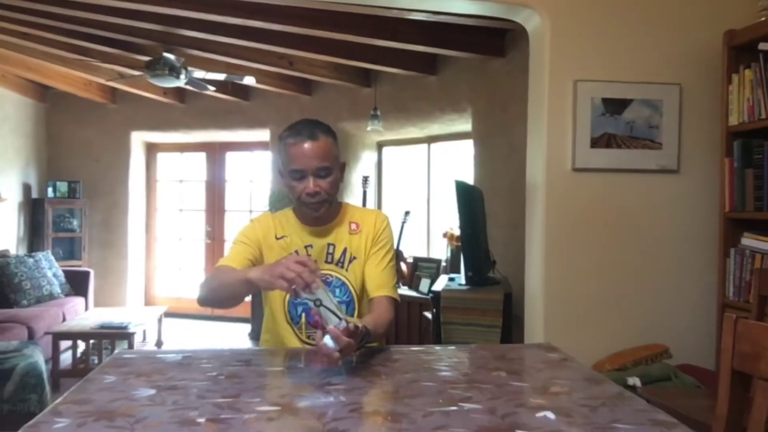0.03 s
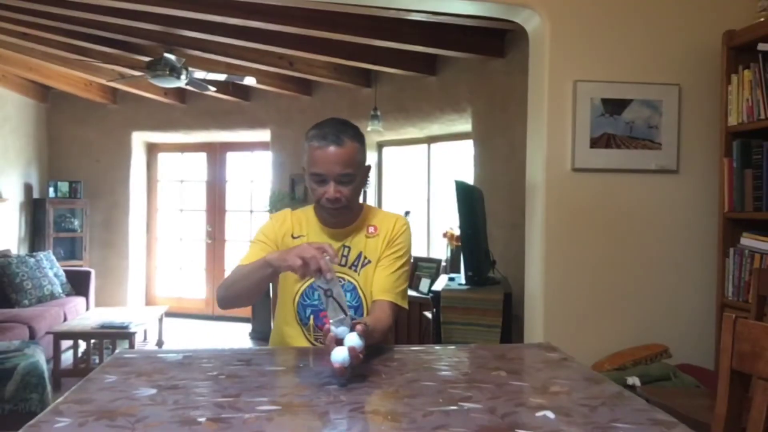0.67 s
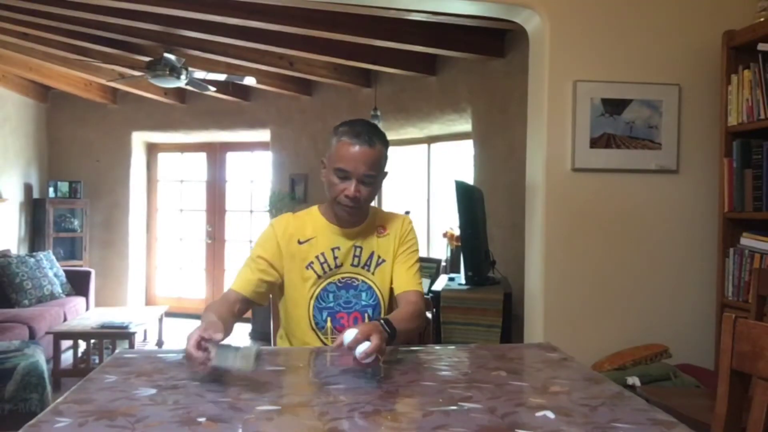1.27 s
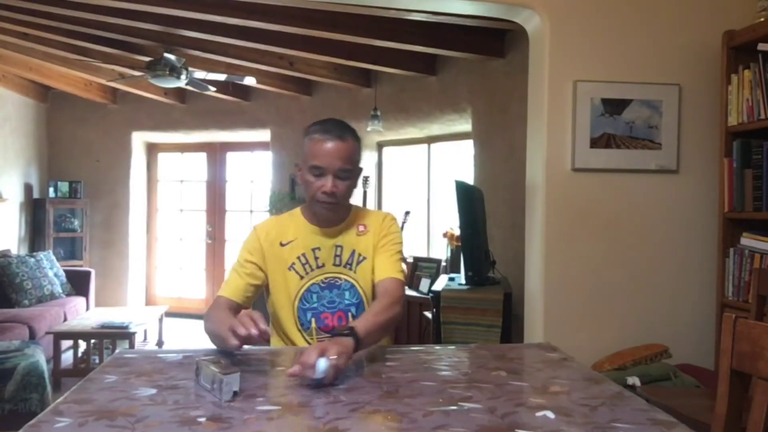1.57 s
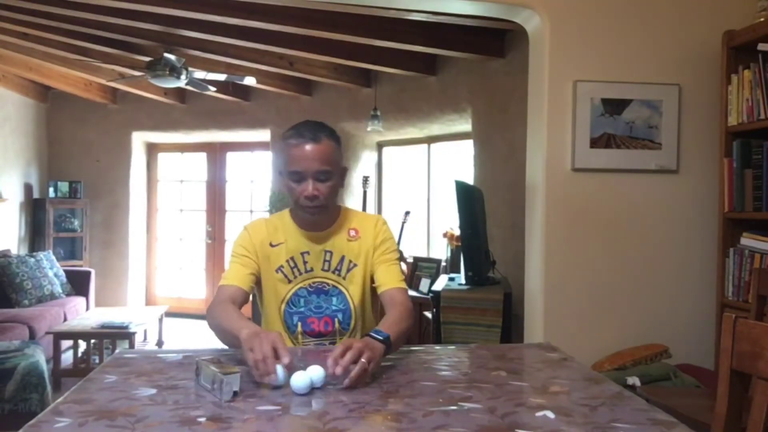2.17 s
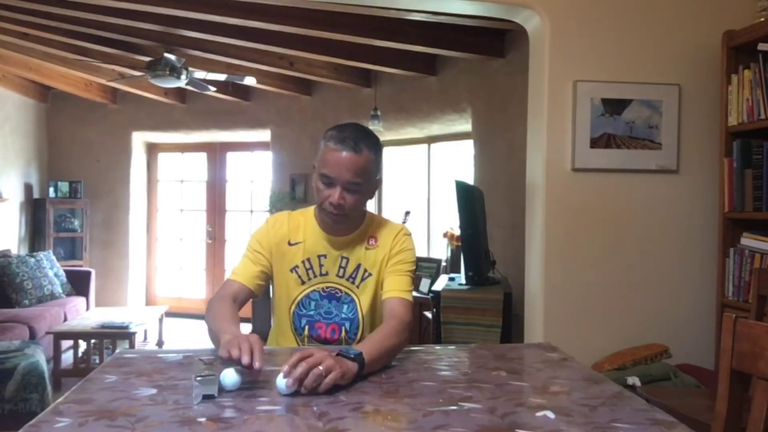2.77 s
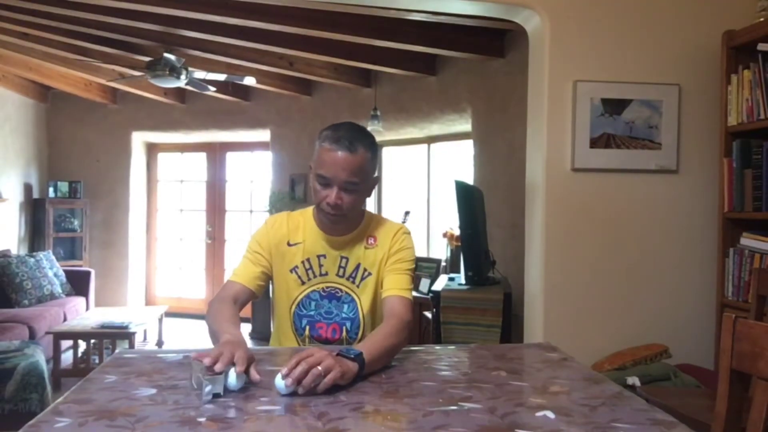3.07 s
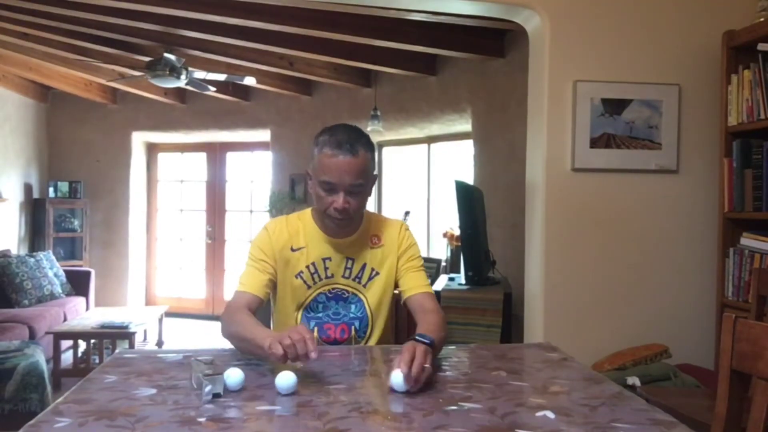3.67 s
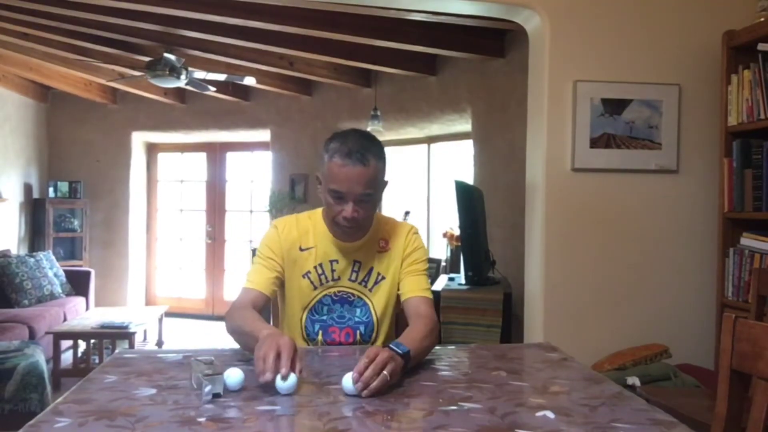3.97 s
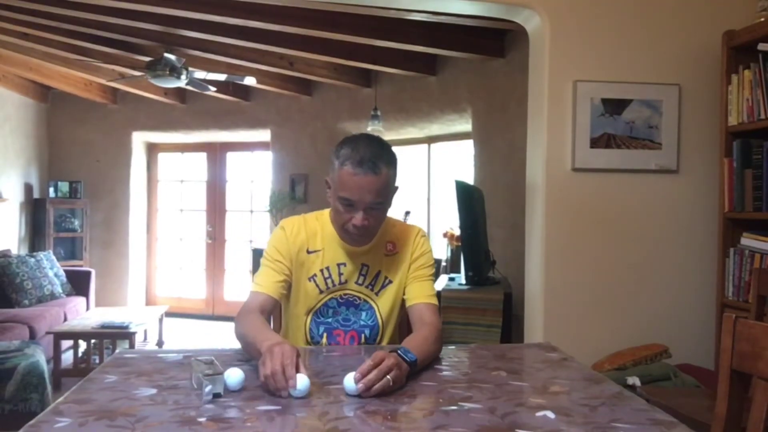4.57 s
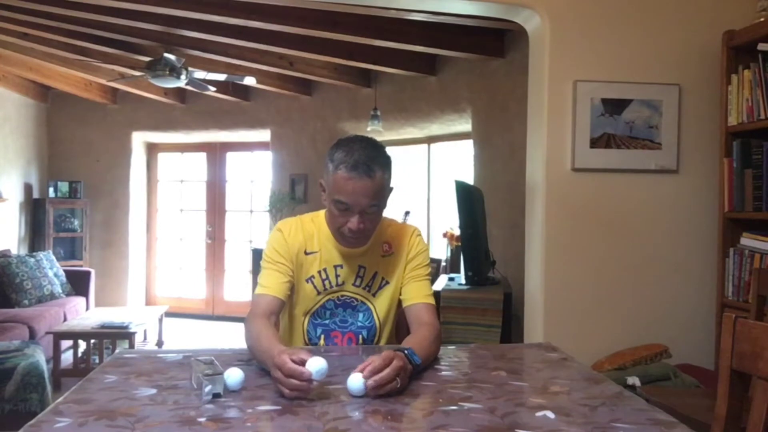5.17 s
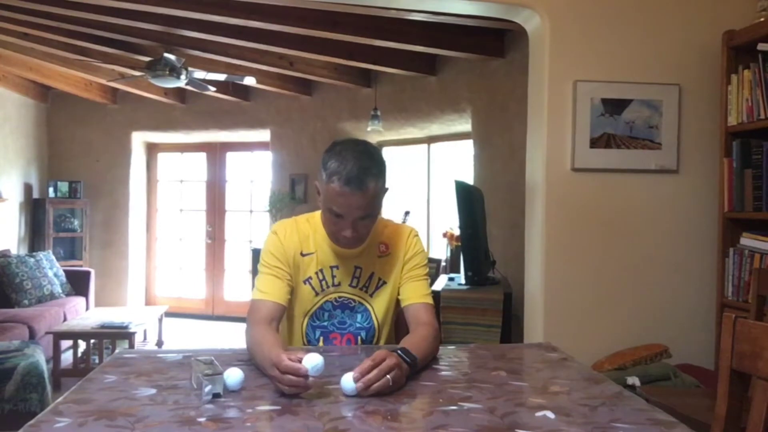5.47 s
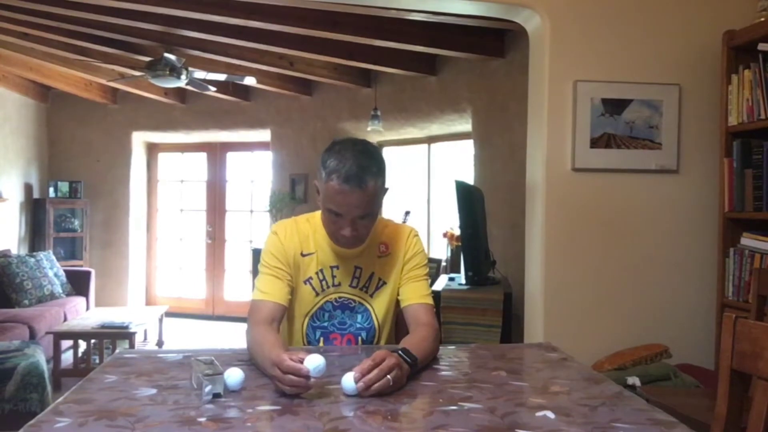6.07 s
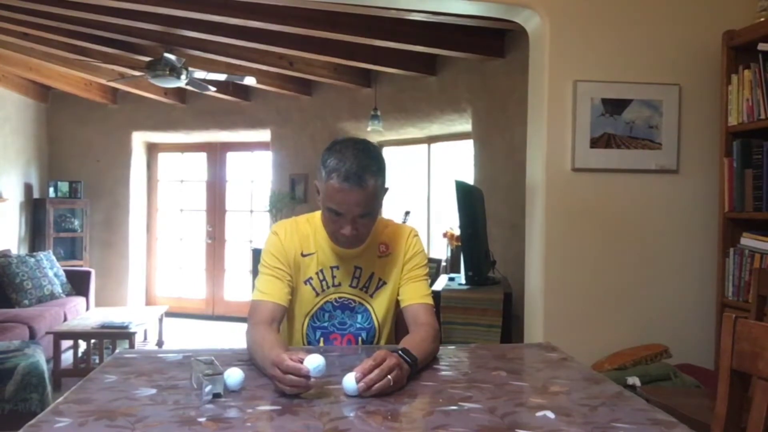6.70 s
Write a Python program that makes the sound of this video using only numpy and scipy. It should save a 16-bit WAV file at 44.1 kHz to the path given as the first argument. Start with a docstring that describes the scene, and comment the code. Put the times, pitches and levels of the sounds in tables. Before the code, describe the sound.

Golf balls knock and bounce on a booming tabletop indoors, after a small plastic case is handled and set down with a clack.

```python
"""Golf balls on a living-room table

Indoors, one microphone near a large table. Fingers rustle and tap on a plastic case, the case is
put down with a clack, and golf balls tipped out of it knock and bounce, each blow setting the
tabletop booming. The balls roll a little, nudge the case and squeak once; a hand pats the table
and leans on it. The room answers each blow over a faint hum."""
import sys
import numpy as np
from scipy import signal
from scipy.fft import rfft, irfft
from scipy.io import wavfile

SR = 44100
rng = np.random.default_rng(int(sys.argv[2]) if len(sys.argv) > 2 else 0)


def int16_out(signal):
    """Quantize to a 16-bit WAV file."""
    q = np.round(np.clip(np.atleast_2d(signal).T, -1, 1) * 32767)
    wavfile.write(sys.argv[1], SR, q.astype(np.int16))


N = 305877
T = np.arange(N) / SR

# Room tone. Each row: frequency in Hz, relative spectral level in dB.
AIR_SPECTRUM = [(15, -64.5), (25, -24.5), (76, -1), (117, -3), (145, -4), (180, -1), (326, -10),
                (363, -7.5), (439, -16), (818, -19.5), (911, -21), (988, -21), (3340, -28.5), (12500, -35),
                (16000, -43)]
# Hum in the room. Each row: pitch in Hz, rough bandwidth in Hz, level in dB.
HUM_TONES = [(120, 3.9, -77), (239, 22, -73.5), (353.7, 23, -72)]
# The room's answer. Each row: frequency in Hz, relative level in dB, t60 in seconds.
ROOM_DECAY = [(122, -21, 0.56), (258, -5.5, 0.4), (553, -1, 0.53), (1080, -3, 0.47), (2040, -3.5, 0.57),
              (3900, -1.5, 0.38), (8100, -1, 0.44), (16100, -2, 0.13)]
# First echoes off nearby surfaces. Each row: delay in seconds, level against the direct sound in dB.
EARLY_ECHOES = [(.0072, -13), (0.0115, -16)]
# Finger strokes. Each row: start and length in seconds, hiss in dB, hollow body against the hiss in dB.
FINGER_STROKES = [(0, 0.0077, -61.5, 2.5), (0.2, 0.073, -69.5, 4.5), (0.363, 0.055, -68.5, 1),
                  (0.66, .11, -74, 2.5), (1.076, 0.017, -69.5, -6), (1.196, 0.021, -64.5, -8.5),
                  (1.33, .03, -80, -18), (2.156, 0.087, -75, -7), (3.444, .015, -77, -14),
                  (3.598, 0.019, -72, -15)]
# Skin rubbing on plastic. Each row: frequency in Hz, relative spectral level in dB.
RUSTLE_SPECTRUM = [(300, -2), (700, 4.5), (1000, 9.5), (2000, -2), (3000, -1.5), (5500, -7), (9000, -9.5),
                   (12500, -8.5), (15500, -30)]
# Taps on the case, and balls bumping it.
# Each row: start in seconds, strength in dB, brightness in dB per octave.
CASE_TAPS = [(.003, -64.5, -5.5), (0.1995, -69, -1.5), (0.375, -73.5, -5.5), (0.481, -68, -1),
             (0.748, -87, -10.5), (1.1813, -56, 7), (1.236, -64.5, 3), (1.321, -64, 2.5),
             (1.3419, -54.5, 3.5), (1.3877, -49, 9), (1.394, -45, 4.5), (1.4021, -43.5, -2.5),
             (2.54, -66, -2), (2.8018, -70, 4), (3.083, -66.5, 5), (3.129, -65.5, 25)]
CASE_BUMPS = [(0.2701, -64, -2.5), (0.439, -75, -5), (1.3435, -63, 9), (2.475, -47, -2), (2.986, -56.5, -2)]
# A tap's snap, a bump's clack and the chatter of the case's edges. Each row: frequency in Hz, gain in dB.
SNAP_SPECTRUM = [(500, -11), (1100, -8), (2000, 12), (3500, 7), (5500, 6), (7700, -1), (10000, -2),
                 (12500, 3), (15500, -7)]
BUMP_SPECTRUM = [(500, -6.5), (850, -1), (1080, 27), (1400, 20.5), (1700, 7.5), (1950, 17), (2150, 10),
                 (2330, 11), (2600, 7.5), (3000, 19.5), (3550, -12), (4400, 2), (5300, 0), (7500, -2),
                 (10000, -5.5), (12500, -4), (15500, -17)]
CHATTER_SPECTRUM = [(200, -18.5), (450, 15), (800, 8), (1100, 21), (1500, 10), (2000, 17), (2600, 4),
                    (4000, 8), (5500, -1), (8000, -5.5), (12500, -11), (15500, -15)]
# Modes of the case's walls, its base and the tabletop. Each row: pitch in Hz, gain in dB, t60 in seconds.
WALL_MODES = [(1048, -6.5, 0.24), (1097, 1.5, 0.043), (1224, -3, 0.037), (1266, -6, 0.05), (1370, 4, 0.013),
              (1520, -1.5, 0.037), (1900, 2.5, 0.014), (2320, 2, 0.022), (2780, 3, 0.015),
              (3220, 3, 0.0085), (4200, 0, 0.013), (5270, -2, 0.007), (5830, -10, 0.01)]
BASE_MODES = [(145.7, -11.5, 0.33), (263, -12, 0.22), (316, -4, 0.098), (388, -1, 0.034), (530, -15, 0.044),
              (624, -6, 0.031), (1023, -0.5, 0.023), (1190, -3, 0.015), (1720, 4, 0.011), (2000, 3, 0.024)]
TABLE_MODES = [(67.4, -25, 0.67), (96.17, -8.5, 1), (107, -5, 0.68), (144.3, -0.5, 0.63),
               (178.5, -12, 0.64), (181.8, -4, 0.28), (247.4, -2.5, 0.46), (270.4, 0, 0.26),
               (289, -4, 0.18), (332, 1, 0.12), (365, -9.5, 0.2), (399.9, -5.5, 0.17), (472.4, -8, 0.11),
               (492, -7.5, 0.2), (536.6, -10.5, 0.18), (600, -13, 0.15), (626, -14, 0.12),
               (661.5, -10, 0.17), (755.5, -6.5, 0.075), (837, -2.5, 0.094), (910, -19.5, 0.038),
               (934, -3, 0.068), (951, -7.5, 0.083), (1064, -15, 0.096), (1158, -0.5, 0.032),
               (1250, 2, 0.021)]
# A hand comes down softly on the table. Each row: start in seconds, strength in dB.
HAND_PATS = [(3.432, -42.5), (3.506, -49), (3.587, -64), (4.32, -54)]
# A hand leans on the table. Each row: start in seconds, length in seconds, level in dB.
HAND_LEANS = [(4.315, 0.062, -58.5)]
# A ball rolls. Each row: start of full speed in seconds, its length in seconds, force in dB.
BALL_ROLLS = [(1.95, 0.013, -36.5), (2.37, 0.074, -46.5)]
# Blows and bounces on the table. Each row: start in seconds, strength in dB, contact cut-off in Hz
# (higher is harder), tick strength in dB, tick pitch in Hz, emphasis of that pitch in dB.
BALL_KNOCKS = [(1.343, -59, 850, -60, 2980, 18), (1.6538, -29.5, 1310, -36, 3600, -2),
               (1.7687, -32, 930, -39.5, 5060, -2), (1.8193, -27.5, 1100, -32, 4570, -8),
               (1.8789, -31.5, 970, -38, 7200, 9), (1.9248, -34, 840, -42.5, 6600, 3),
               (1.9569, -40, 730, -45.5, 6150, -1), (1.982, -41.5, 600, -52.5, 6200, 1),
               (2.003, -50, 500, -55, 6000, -4), (2.4745, -51.5, 920, -64, 4300, 2),
               (2.986, -62, 614, -74, 5500, -9), (3.632, -36, 620, -46.5, 5630, -7),
               (3.966, -35, 573, -44.5, 5270, 0), (5.4994, -37.5, 546, -49, 4800, -14)]
# A ball's tick and the tabletop's crowded upper modes. Each row: frequency in Hz, gain in dB.
TICK_SPECTRUM = [(800, -2), (1750, 12.5), (2600, -3.5), (3700, 1.5), (4600, -4.5), (5600, 0.5),
                 (7500, -9.5), (10000, -7.5), (12500, -4.5), (15500, -22)]
KNOCK_SPECTRUM = [(300, -35.5), (520, 2.5), (800, 0), (1000, 2.5), (1220, -3.5), (1450, -11), (1750, -3),
                  (2400, -15), (5000, -31)]


def from_db(db):
    """Decibels to gain."""
    return 10 ** (np.asarray(db) / 20)


def rms_one(x):
    """Scale to unit rms."""
    return x / np.sqrt(np.mean(x ** 2) + 1e-30)


def at_hz(points, hz):
    """The columns of a table read on a log-frequency axis."""
    table_hz, *columns = np.transpose(points)
    return [np.interp(np.log(np.maximum(hz, 1)), np.log(table_hz), column) for column in columns]


def butter(x, kind, hz, order):
    """Butterworth low-, high- or band-pass."""
    return signal.sosfilt(signal.butter(order, hz, kind, fs=SR, output="sos"), x + 1e-18)


def coloured(x, spectrum, size=8192):
    """Causal (minimum-phase) filter with the given spectrum."""
    level_db, = at_hz(spectrum, np.arange(size // 2 + 1) * SR / size)
    cepstrum = irfft(np.log(from_db(level_db)))
    cepstrum[1:size // 2] *= 2
    cepstrum[size // 2 + 1:] = 0
    return signal.fftconvolve(x, irfft(np.exp(rfft(cepstrum))))[:N]


def clicks(times, level_db, swing=1):
    """One impulse at each time; swing gives it a direction and a share."""
    out = np.zeros(N)
    samples = np.round(np.asarray(times) * SR).astype(int)
    np.add.at(out, samples, swing * from_db(level_db))
    return out


def swells(rows, rise_db_per_s, fall_db_per_s):
    """Level in dB of gestures that each rise, hold and die away."""
    levels = [db - rise_db_per_s * np.maximum(start - T, 0)
              - fall_db_per_s * np.maximum(T - start - length, 0) for start, length, db in rows]
    return np.max(levels, axis=0).clip(-200)


def ring(force, hz, t60):
    """One mode: a unit impulse sets a sine of height 1 ringing."""
    radius = np.exp(-np.log(1000) / (t60 * SR))
    angle = 2 * np.pi * hz / SR
    return signal.lfilter([0, np.sin(angle)], [1, -2 * radius * np.cos(angle), radius ** 2], force + 1e-18)


def burst(force, decay_s):
    """Many heavily damped modes at once: a noise that dies quickly after each impulse."""
    envelope = signal.lfilter([1], [1, -np.exp(-1 / (decay_s * SR))], force + 1e-18)
    return envelope * rng.standard_normal(N)


def room_tone(air_db):
    """Steady hiss and rumble all round the microphone, with a few wavering hum tones."""
    air = from_db(air_db) * rms_one(coloured(rng.standard_normal(N), AIR_SPECTRUM))
    hum = sum(from_db(db) * rms_one(ring(rng.standard_normal(N), hz, t60=2 / width))
              for hz, width, db in HUM_TONES)
    return air + hum


def room(direct, gap_s, early_db, early_t60, tail_db):
    """At the microphone: direct sound, two echoes, scatter off furniture and a tail that dies by band."""
    t, response = np.arange(SR) / SR, np.zeros(SR)
    edges_hz = np.geomspace(110, 17000, 15)
    for low, high in zip(edges_hz, edges_hz[1:]):
        wet_db, t60 = at_hz(ROOM_DECAY, np.sqrt(low * high))
        envelope = from_db(tail_db - 60 * t / t60) + from_db(early_db - 60 * t / early_t60)
        band = butter(envelope * (t > gap_s) * rng.standard_normal(len(t)), "band", [low, high], order=2)
        band_share = 2 * (high - low) / SR
        response += from_db(wet_db) * rms_one(band) * np.sqrt(band_share / len(t))
    # nearby surfaces mirror all but the longest waves
    mirrored = butter(clicks(*np.transpose(EARLY_ECHOES)), "high", hz=450, order=2)
    return direct + signal.fftconvolve(direct, response + mirrored[:len(t)])[:N]


def fingers(grain_db, split_hz):
    """Skin catches and slips on plastic: hollow under a firm grip, hissy under a light one."""
    starts, lengths, db, body_db = np.transpose(FINGER_STROKES)
    hiss_db, hollow_db = (swells(zip(starts, lengths, level), rise_db_per_s=300, fall_db_per_s=107)
                          for level in (db, db + body_db))
    catch = rms_one(butter(rng.standard_normal(N), "low", hz=100, order=2))
    grains = from_db(grain_db * catch) * rng.standard_normal(N)
    rustle = rms_one(coloured(grains, RUSTLE_SPECTRUM))
    hiss = butter(rustle, "high", split_hz, order=3)
    hollow = butter(rustle, "low", split_hz, order=3)
    return from_db(hiss_db) * hiss + from_db(hollow_db) * hollow


def plastic_case(spread_db, pivot_hz):
    """Taps snap and bumps clack; each meets the thin walls at another spot and rings them differently."""
    starts, strength_db, brightness = np.transpose(CASE_TAPS + CASE_BUMPS)
    spot_db = spread_db * rng.standard_normal((len(starts), len(WALL_MODES)))
    taps = clicks(*np.transpose(CASE_TAPS)[:2])
    bumps = clicks(*np.transpose(CASE_BUMPS)[:2])
    out = coloured(burst(taps, decay_s=0.0042), SNAP_SPECTRUM)
    out += coloured(burst(bumps, decay_s=0.0091), BUMP_SPECTRUM)
    for k, (hz, db, t60) in enumerate(WALL_MODES):
        tilt_db = brightness * np.log2(hz / pivot_hz)
        force = clicks(starts, strength_db + db + tilt_db + spot_db[:, k])
        out += (-1) ** k * ring(force, hz, t60)
    return butter(out, "high", hz=850, order=4)   # the small case gives off little bass


def case_landing(at_s, slap_db, chatter_db):
    """The light case lands flat: its base slaps and its edges chatter as it settles."""
    force = clicks([at_s], [slap_db])
    slap = sum((-1) ** k * from_db(db) * ring(force, hz, t60)
               for k, (hz, db, t60) in enumerate(BASE_MODES))
    chatter = burst(clicks([at_s], [chatter_db]), decay_s=0.013)
    return slap + coloured(chatter, CHATTER_SPECTRUM)


def leaning_hand(pitch_hz, t60):
    """A leaning hand rocks the whole table on its legs."""
    level_db = swells(HAND_LEANS, rise_db_per_s=900, fall_db_per_s=132)
    return from_db(level_db) * rms_one(ring(rng.standard_normal(N), pitch_hz, t60))


def pat_force():
    """The flesh of a hand gives a slow push that reaches only the lowest modes."""
    return butter(clicks(*np.transpose(HAND_PATS)), "low", hz=116, order=3)


def ball_squeak(at_s, width_s, pitch_hz, level_db, waver):
    """A ball sticks and slips unevenly for a moment as it is pushed along."""
    grip = rms_one(butter(rng.standard_normal(N), "low", hz=440, order=2))
    phase = 2 * np.pi * np.cumsum(pitch_hz * (1 + waver * grip)) / SR
    envelope = np.exp(-((T - at_s) / width_s) ** 2)
    return from_db(level_db + 3.4 * grip) * envelope * np.sin(phase)


def rolling_force(coupling_db):
    """Dimples patter on the surface; a slower ball holds only the lowest part of that force."""
    force_db = swells(BALL_ROLLS, rise_db_per_s=234, fall_db_per_s=148)
    cutoff_hz = 486 * 2 ** ((force_db + 34) / 33)   # sinks an octave for each 33 dB lost
    out, edges_hz = np.zeros(N), np.geomspace(80, 1280, 9)
    for low, high in zip(edges_hz, edges_hz[1:]):
        band = butter(rng.standard_normal(N), "band", [low, high], order=2)
        out += band / np.sqrt(1 + (np.sqrt(low * high) / cutoff_hz) ** 6)
    return out * from_db(force_db + coupling_db)


def ball_ticks(decay_s, peak_q):
    """The hard cover of a ball ticks as it lands, each time around a pitch of its own."""
    out = np.zeros(N)
    for start, _, _, tick_db, hz, emphasis_db in BALL_KNOCKS:
        tick = burst(clicks([start], [tick_db]), decay_s)
        pitched = signal.lfilter(*signal.iirpeak(hz, peak_q, fs=SR), tick)
        out += tick + from_db(emphasis_db) * pitched
    return coloured(out, TICK_SPECTRUM)


def table_knock(gain_db, decay_s):
    """The crowded upper modes of the top give the dry knock; only hard contacts reach them all."""
    out = np.zeros(N)
    for start, blow_db, contact_hz, *_ in BALL_KNOCKS:
        knock = burst(clicks([start], [blow_db + gain_db]), decay_s)
        out += butter(knock, "low", contact_hz, order=4)
    return coloured(out, KNOCK_SPECTRUM)


def table_boom(spot_hz):
    """Blows, rolls and pats drive the same plate modes; a softer contact reaches fewer of them."""
    starts, blow_db, contact_hz = np.transpose(BALL_KNOCKS)[:3]
    gentle_force = rolling_force(coupling_db=-32.5) + pat_force()
    spot = rng.standard_normal((len(starts), len(TABLE_MODES)))
    out = np.zeros(N)
    for k, (hz, db, t60) in enumerate(TABLE_MODES):
        softness_db = 10 * np.log10(1 + (hz / contact_hz) ** 6)
        # low modes answer alike everywhere; high ones are met on a crest, a node or a trough
        swing = np.sqrt(2) * np.cos(np.pi / 4 + spot[:, k] * (hz / spot_hz) ** 2)
        force = clicks(starts, blow_db - softness_db, swing) + gentle_force
        # bending waves disperse: modes start in mixed directions, so the boom takes a moment to swell
        direction = np.sign(np.cos(np.pi * k * k / 17))
        out += direction * from_db(db) * ring(force, hz, t60)
    return out


def scene():
    """Table, balls and case reach the microphone through one room, each from its own place."""
    squeak = ball_squeak(at_s=2.946, width_s=0.0058, pitch_hz=1678, level_db=-52.5, waver=0.037)
    table = table_boom(spot_hz=945) + table_knock(gain_db=17.5, decay_s=0.0049)
    table += leaning_hand(pitch_hz=62, t60=0.16)
    case = plastic_case(spread_db=3.5, pivot_hz=5330)
    case += case_landing(at_s=1.3895, slap_db=-30.5, chatter_db=-41.5)
    ticks = ball_ticks(decay_s=0.0019, peak_q=4.6)
    mix = room(table, gap_s=0.00532, early_db=-4.5, early_t60=0.17, tail_db=3)
    mix += room(ticks, gap_s=0.0043, early_db=2, early_t60=0.16, tail_db=-4)
    handling = case + fingers(grain_db=3.5, split_hz=2470) + squeak
    mix += room(handling, gap_s=0.0063, early_db=-4, early_t60=0.35, tail_db=-2)
    return (mix + room_tone(air_db=-64.75))[None]


def record(dry):
    """The microphone thins the deep bass; the top is cut steeply at 15.9 kHz."""
    thinned = butter(dry, "high", hz=35, order=4)
    return signal.sosfilt(signal.ellip(10, 0.1, 70, 15900, fs=SR, output="sos"), thinned)


dry = scene()
out = record(dry)
int16_out(out)
```